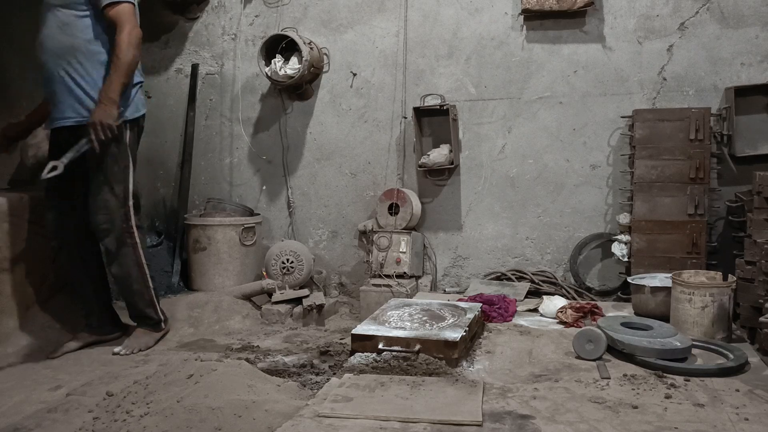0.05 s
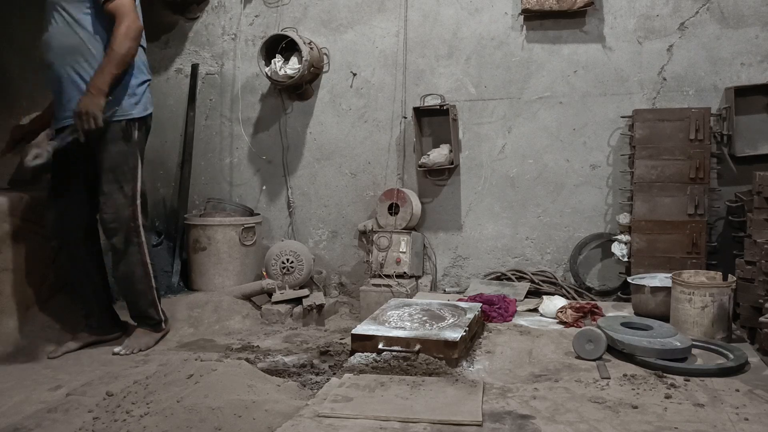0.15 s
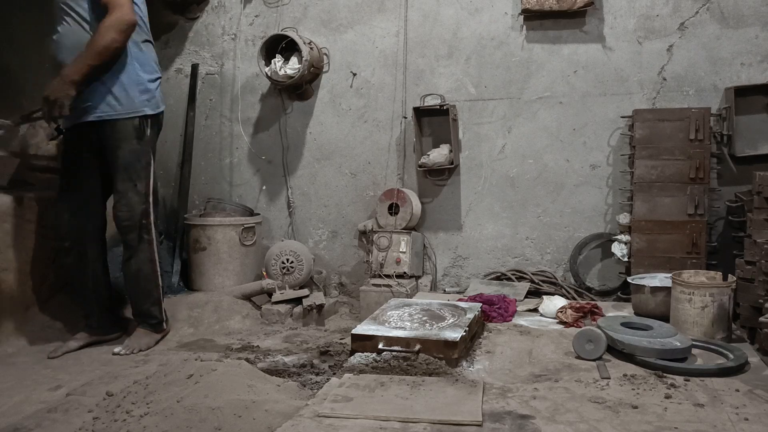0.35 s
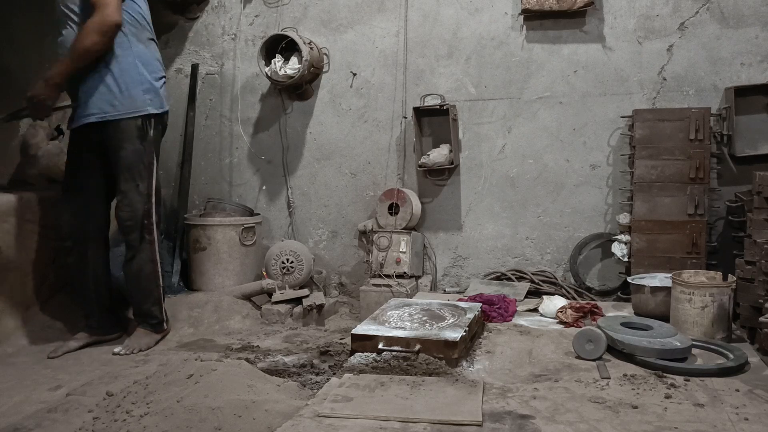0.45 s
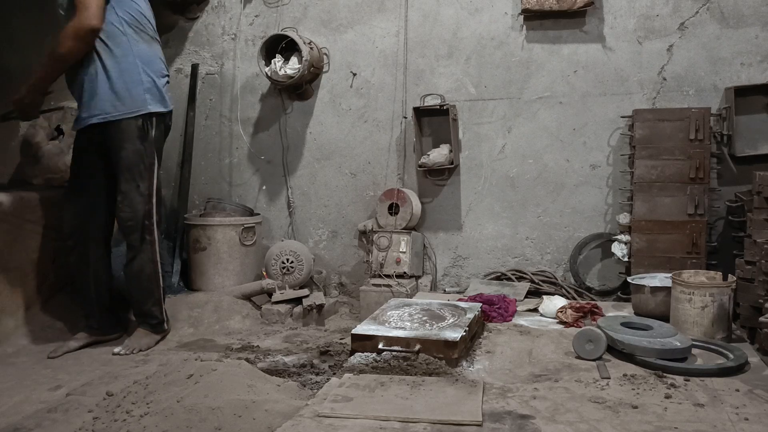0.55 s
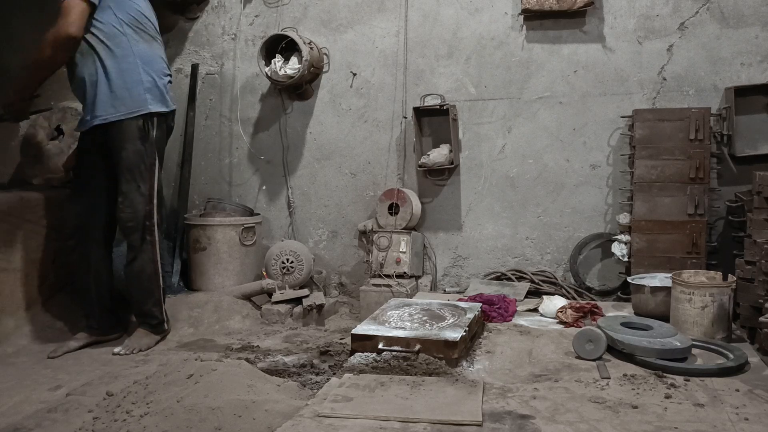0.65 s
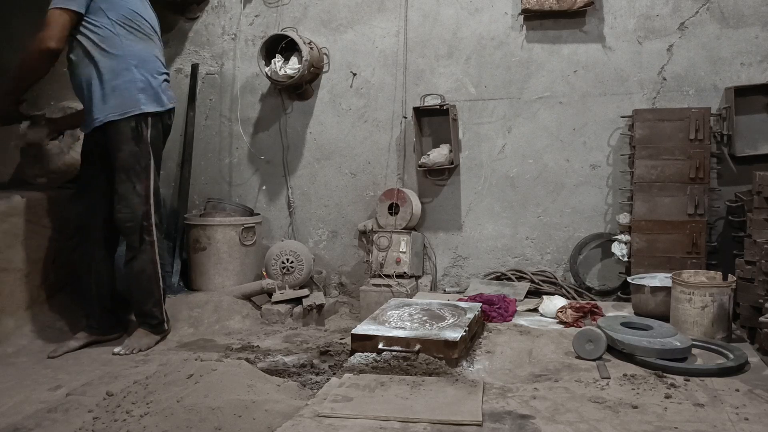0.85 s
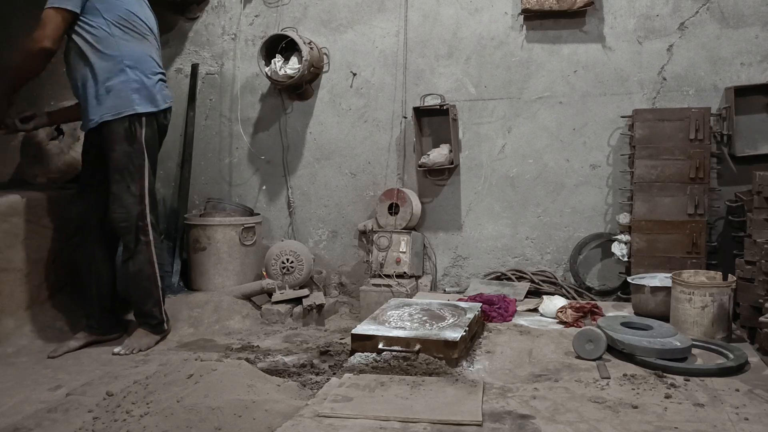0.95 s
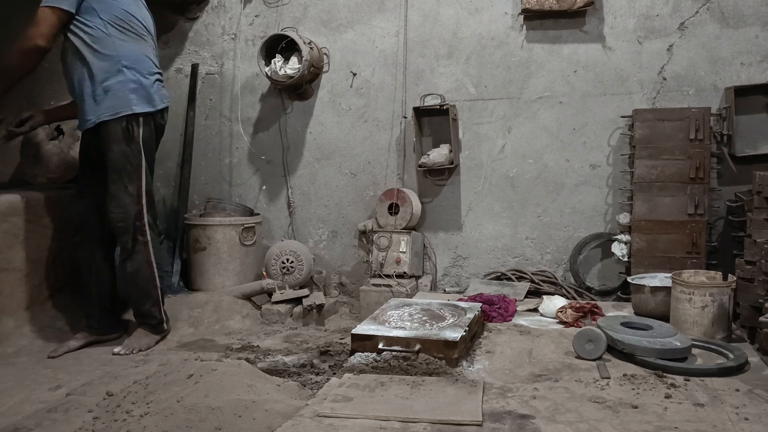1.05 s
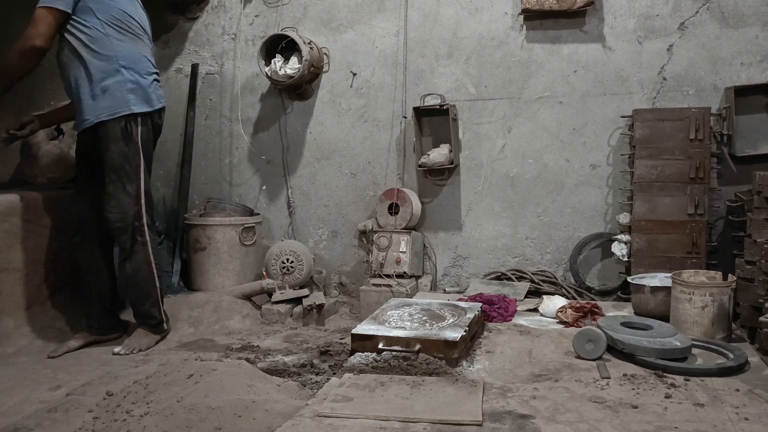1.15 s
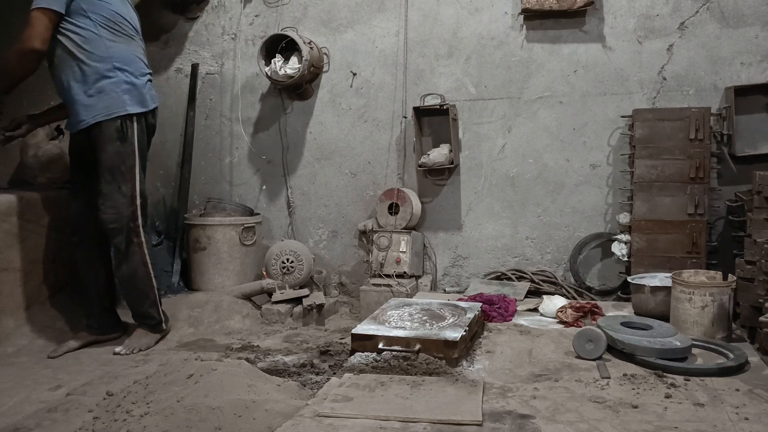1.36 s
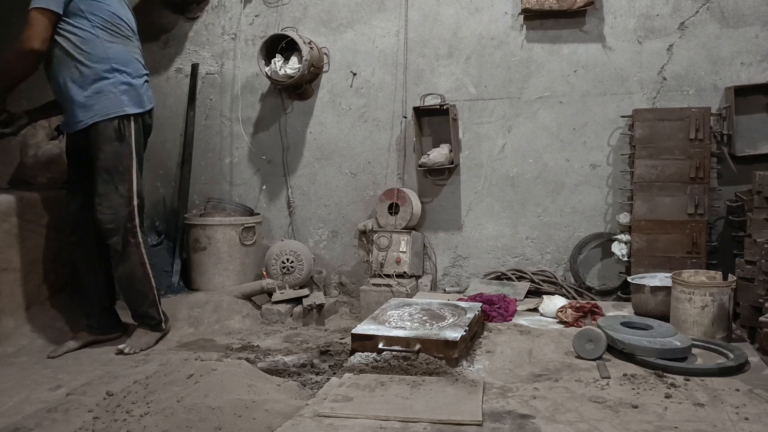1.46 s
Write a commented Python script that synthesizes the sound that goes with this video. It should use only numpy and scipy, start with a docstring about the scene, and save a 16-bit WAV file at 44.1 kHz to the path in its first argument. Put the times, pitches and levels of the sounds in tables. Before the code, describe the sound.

Two sharp, ringing metal knocks over a low machine drone in a small workshop.

```python
"""A small bare workshop, heard through a stereo microphone with two unlike ports.
From the start a machine drones, throbbing once a turn, over faint room hiss.
At 0.2 s a metal tool is knocked hard against iron and rebounds; at 0.6 s a lighter piece clatters down.
Each blow rings a few modes over a dense clash that the concrete walls prolong.
A faint ting follows near 1 s, then a soft, high scuff, while the machine runs on."""
import sys
import numpy as np
from scipy import signal
from scipy.fft import rfft, irfft
from scipy.io import wavfile
from scipy.ndimage import uniform_filter1d

SR = 44100
rng = np.random.default_rng(int(sys.argv[2]) if len(sys.argv) > 2 else 0)


def dump(signal):
    """Clip the signal to [-1, 1] and save it as 16-bit WAV at the path in sys.argv[1]."""
    limited = np.clip(np.atleast_2d(signal).T, -1, 1)
    pcm = np.round(limited * 32767).astype(np.int16)
    wavfile.write(sys.argv[1], SR, pcm)


N = 66150

# reverberation of the workshop (frequency [Hz], t60 [s])
ROOM_DECAY = [(150, 1), (800, 0.36), (2000, 0.59), (4000, 0.48), (8000, 0.37), (15000, 0.2)]
SHIMMER_LOW_HZ, SHIMMER_TOP_HZ = 2680, 14990  # span of the metal's weak upper modes


def amp(db):
    """Decibels to gain."""
    return 10 ** (np.asarray(db) / 20)


def unit(x):
    """Scales to rms 1."""
    return x / np.sqrt(np.mean(abs(x) ** 2) + 1e-20)


def read(points, hz):
    """Reads a table on a log-frequency axis."""
    f, value = np.transpose(points)
    return np.interp(np.log(hz + 1), np.log(f + 1), value)


def add(mix, start_s, sound):
    """Mixes a stereo sound in at start_s."""
    part = mix[:, round(start_s * SR):]
    part += sound[:, :part.shape[1]]


def wander(hz):
    """Slow complex random drift of rms about 1, up to about hz."""
    steps, step_hz = 1024, 400
    f = np.fft.fftfreq(steps, 1 / step_hz)
    drift = np.fft.ifft(np.exp(2j * np.pi * rng.random(steps) - .5 * (f / hz) ** 2))
    return np.interp(np.arange(N) / SR, np.arange(steps) / step_hz, unit(drift))


def machine():
    """A shaft hums on its orders and thumps once a turn; the thump swells and fades."""
    # partials of the hum (order [multiple of the turn rate], relative level [dB])
    orders = [(4, -25), (5, -10), (6, -9.5), (7, -26.5), (8, -3.5), (9, 4), (10, -3), (11, -10.5), (12, -9),
              (13, -15), (14, -23.5), (15, -15.5), (16, -17)]
    # course of the drone (time [s], relative hum level [dB], relative thump level [dB])
    levels = [(0, -35.5, -29.5), (.15, -37, -45), (.28, -34.5, -31), (.38, -33.5, -23.5), (.55, -31.5, -26),
              (.68, -30, -36), (.82, -30.5, -41), (1.0, -34.5, -51), (1.149, -36.5, -68),
              (1.27, -33.5, -43), (1.4, -31.5, -29), (1.5, -31.5, -25)]
    turn_hz, throb_at_s, port_lag_s = 24.77, 0.375, 0.00035
    thump_hz, thump_width_s = 269, 0.0038
    t, hum = np.arange(N) / SR, np.zeros((2, N))
    sides = np.array([[.5], [-.5]])
    turns = turn_hz * (t - throb_at_s - sides * port_lag_s)
    for order, db in orders:
        smear_rad = 2.08 * (1 - amp(db)) * rng.standard_normal()  # weak orders stray furthest in phase
        partial = np.exp(1j * (2 * np.pi * round(order) * turns + smear_rad))
        hum -= amp(db) * (partial * (1 + .1 * wander(hz=2))).real
    from_thump_s = (turns - np.round(turns)) / turn_hz
    pulse = np.exp(-.5 * (from_thump_s / thump_width_s) ** 2)
    thump = -pulse * np.cos(2 * np.pi * thump_hz * from_thump_s)
    times, hum_db, thump_db = np.transpose(levels)
    drone = unit(hum) * amp(np.interp(t, times, hum_db) - 0.5)
    drone += thump * amp(np.interp(t, times, thump_db) - 4.5)
    return drone * amp(-1.4 * sides)  # a little to the right


def room_air():
    """Room tone: low rush and hiss, near mono in the bass and wide in the treble."""
    # spectrum of the room tone (frequency [Hz], relative density [dB])
    colour = [(20, -39), (32, -27), (48, -19), (80, -2), (130, 0), (250, 4), (400, -4.5), (650, -3),
              (1000, -7.5), (2000, -12), (3200, -17.5), (4500, -18.5), (5600, -30), (6700, -41),
              (8200, -30.5), (10000, -40.5), (15000, -40)]
    # likeness of left and right (frequency [Hz], correlation [0-1])
    likeness = [(50, 0.64), (250, .9), (500, 0.46), (1000, 0), (3000, 0)]
    level_db, patch_db = -41, 1.35
    hz, _, noise = signal.stft(rng.standard_normal((2, N)), SR, nperseg=1024, noverlap=768)
    shared = np.clip(read(likeness, hz), -1, 1)[:, None]
    noise[1] = shared * noise[0] + np.sqrt(1 - shared ** 2) * noise[1]
    # the level flickers in patches of frequency and time
    patches = uniform_filter1d(rng.standard_normal(noise[0].shape), size=14, axis=0)
    patches = unit(uniform_filter1d(patches, size=10, axis=1))
    noise *= amp(read(colour, hz)[:, None] + patch_db * patches)
    hiss = signal.istft(noise, SR, nperseg=1024, noverlap=768)[1]
    return amp(level_db) * unit(hiss[:, :N])


def clash(colour, ripple_db):
    """Countless short modes and wall echoes: a ridged wash, dying fastest in the top treble."""
    hz, t, noise = signal.stft(rng.standard_normal((2, N)), SR, nperseg=1024)
    ridges_db = np.interp(hz, np.linspace(0, SR / 2, len(ripple_db)), ripple_db) * (hz > SHIMMER_LOW_HZ)
    noise *= amp(read(colour, hz) + ridges_db)[:, None]
    decay = amp(-60 * t / read(ROOM_DECAY, hz)[:, None])
    steady = signal.istft(noise, SR)[1]
    tail = signal.istft(noise * decay, SR)[1]
    return tail[:, :N] / steady.std()


def ring(modes):
    """Dying modes; the room makes each swell and beat differently at each microphone port."""
    port_phase_rad, beat_depth, beat_hz = 1.32, 0.75, 25.8
    t, out = np.arange(N) / SR, np.zeros((2, N))
    for hz, db, t60 in modes:
        tone = amp(db - 60 * t / t60) * np.exp(2j * np.pi * (hz * t + rng.random()))
        for side, direct in zip(out, (1, np.exp(1j * port_phase_rad))):
            side += (tone * (direct + beat_depth * wander(beat_hz))).real
    return out


def shimmer(colour, count=130, spread_db=4):
    """The weak upper modes of an irregular piece of metal, rms 1 at the blow."""
    offset, strength = rng.random((count, 3)).T[:2]
    pitches = SHIMMER_LOW_HZ + (SHIMMER_TOP_HZ - SHIMMER_LOW_HZ) * (np.arange(count) + offset) / count
    gains = amp(read(colour, pitches) + spread_db * np.sqrt(3) * (2 * strength - 1))
    gains *= np.sqrt(2) / np.linalg.norm(gains)
    phases = rng.random((count, 2, 1))
    t, out = np.arange(N // 2) / SR, np.zeros((2, N))
    for hz, gain, t60, phase in zip(pitches, gains, read(ROOM_DECAY, pitches), phases):
        out[:, :len(t)] += gain * amp(-60 * t / t60) * np.sin(2 * np.pi * (hz * t + phase))
    return out


def struck_metal(contacts, modes, colour, ring_db, clash_db, shimmer_db, build_s):
    """Each contact cracks, starts a clash and feeds more energy into the modes."""
    attack_s, crack_db, crack_s = 0.00052, -2.5, 0.0042
    t, out, energy = np.arange(N) / SR, np.zeros((2, N)), np.zeros(N)
    first_s = contacts[0][0]
    ripple_db = 3.2 * unit(np.diff(rng.random(size=240)))  # the small resonances are uneven
    onset = np.minimum(t / attack_s, 1) * (1 + amp(crack_db) * np.exp(-t / crack_s))
    for at_s, db in contacts:
        add(out, at_s, amp(clash_db + db) * onset * clash(colour, ripple_db))
        since_s = np.maximum(t + first_s - at_s, 0)
        energy += amp(db) ** 2 * (1 - np.exp(-since_s / build_s))
    ringing = amp(ring_db) * ring(modes) + amp(shimmer_db) * shimmer(colour)
    add(out, first_s, np.sqrt(energy) * ringing)
    return out


def iron_knock():
    """A tool hits heavy iron and rebounds twice; the ring builds up behind the clash."""
    # the blow and its rebounds (time [s], relative level [dB])
    contacts = [(0.2142, 0), (0.2275, -1), (0.2525, -4.5)]
    # modes of the iron (frequency [Hz], relative level [dB], t60 [s])
    modes = [(312, -10, .15), (779, -20, .55), (797, -11.5, .6), (1445, -12, .55), (1474, -6.5, .62),
             (2250, -14, .4), (2284, 0, .46), (2980, -15, .42), (3020, -12, .44), (3162, -12, .48),
             (3233, -9, .5), (3254, -6, .58), (3610, -16, .45), (5023, -20, .42)]
    # spectrum of its clash (frequency [Hz], relative density [dB])
    colour = [(100, -39), (310, -14.5), (450, -22.5), (650, -23.5), (850, -8.5), (1100, -12.5),
              (1500, -6.5), (2000, -12.5), (3000, -3), (4000, -4), (5700, -7.5), (6500, -21), (7200, -12.5),
              (9000, -19.5), (11500, -21), (13000, -31), (14300, -20), (16000, -43)]
    return struck_metal(contacts, modes, colour,
                        ring_db=-11, clash_db=-15.5, shimmer_db=-23, build_s=0.043)


def piece_clatter():
    """A lighter piece lands in four quick contacts and rings higher, almost at once."""
    # the landing and its bounces (time [s], relative level [dB])
    contacts = [(0.6362, -6.5), (0.6445, -6.5), (0.6512, -1), (0.6765, -14)]
    # modes of the piece (frequency [Hz], relative level [dB], t60 [s])
    modes = [(1561, -16, .45), (2000, -9, .42), (2046, 1.5, .5), (2068, -8, .42), (2590, -7, .5),
             (2610, -5, .52), (3468, -7, .38), (3972, -5, .48), (4010, -3, .5), (4231, -8, .45),
             (4697, -7, .55), (4935, -7, .42), (5642, -11, .45), (8193, -12, .45)]
    # spectrum of its clash (frequency [Hz], relative density [dB])
    colour = [(300, -18), (1100, -11), (1600, -3), (2100, -3.5), (2900, -5.5), (3400, 0), (4100, 6),
              (4450, -2), (4850, 7.5), (5350, -9), (5700, -2), (6600, -10), (7500, -9), (8200, 2),
              (9300, -8), (10100, -3), (12000, -8), (14000, -9), (16000, -28)]
    return struck_metal(contacts, modes, colour,
                        ring_db=-29, clash_db=-25, shimmer_db=-31.5, build_s=0.0041)


def ting(at_s=0.994, hz=3980, db=-33, t60_s=.08, rise_s=.005):
    """Metal barely touches metal, and one mode rings briefly."""
    out = np.zeros((2, N))
    rise = 1 - np.exp(-np.arange(N) / SR / rise_s)
    add(out, at_s, ring([(hz, db, t60_s)]) * rise)
    return out


def scuff(at_s=1.135, width_s=0.037, centre_hz=11600, width_hz=2500, db=-66):
    """A soft, high brush of noise."""
    band = np.exp(-.5 * ((np.fft.rfftfreq(N, 1 / SR) - centre_hz) / width_hz) ** 2)
    grit = unit(irfft(rfft(rng.standard_normal((2, N))) * band, N))
    swell = np.exp(-.5 * ((np.arange(N) / SR - at_s) / width_s) ** 2)
    return amp(db) * grit * swell


def scene():
    """Two impacts and two faint touches over the machine and the room tone."""
    return iron_knock() + piece_clatter() + ting() + scuff() + machine() + room_air()


def record(dry):
    """The microphone: its two ports differ in the treble, peaks overload softly, the very top is cut."""
    # imbalance of the ports (frequency [Hz], left minus right [dB])
    ports = [(300, 0), (800, 0.5), (1600, -2), (2400, -2.5), (3400, -6), (5000, -12), (6000, -3),
             (6700, -4), (7400, 32), (8300, 23), (10000, 17), (11500, 16), (12800, 5), (14200, 2),
             (15500, -3)]
    fade_out_s, cutoff_hz = .004, 15900
    ratio = amp(read(ports, np.fft.rfftfreq(2 * N, 1 / SR)))
    gains = np.array([ratio, np.ones_like(ratio)]) * np.sqrt(2 / (1 + ratio ** 2))  # constant power
    fade = np.minimum(np.arange(N)[::-1] / SR / fade_out_s, 1)
    coloured = irfft(rfft(dry * fade, 2 * N) * gains)[:, :N]
    overloaded = coloured / (1 + coloured ** 6) ** (1 / 6)
    lowpass = signal.firwin(255, cutoff_hz, window=("kaiser", 9), fs=SR)
    return signal.oaconvolve(overloaded, lowpass[None], "same")


dry = scene()
out = record(dry)
dump(out)
```